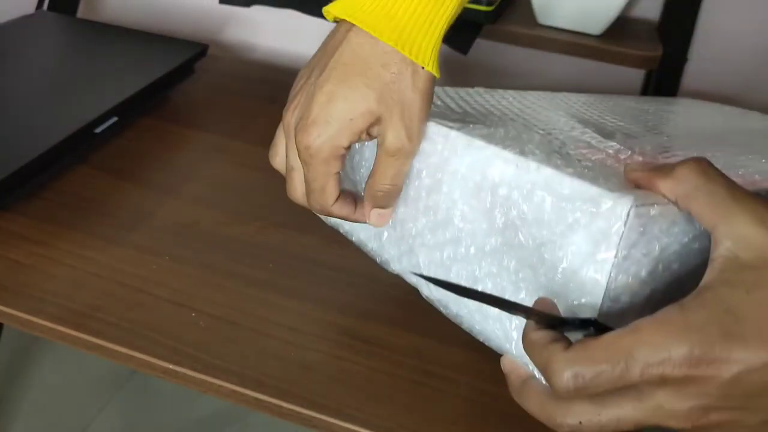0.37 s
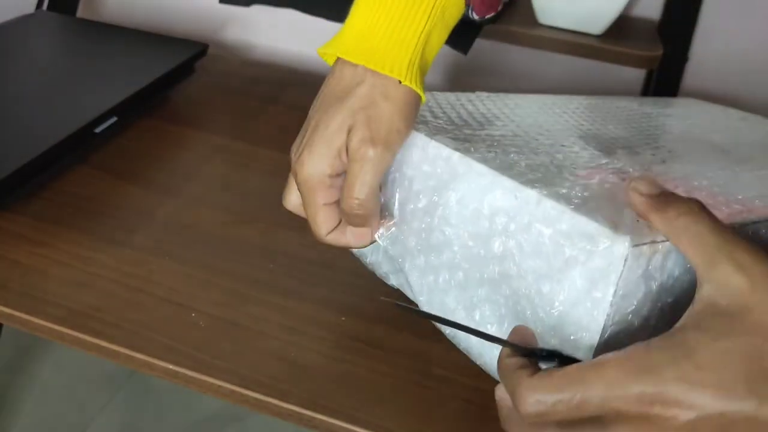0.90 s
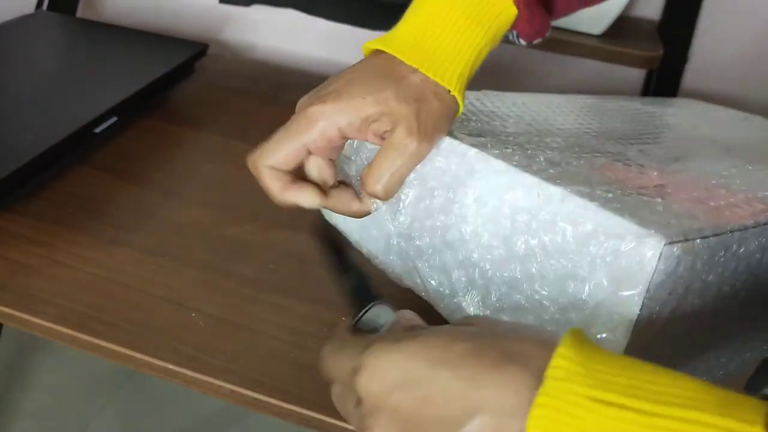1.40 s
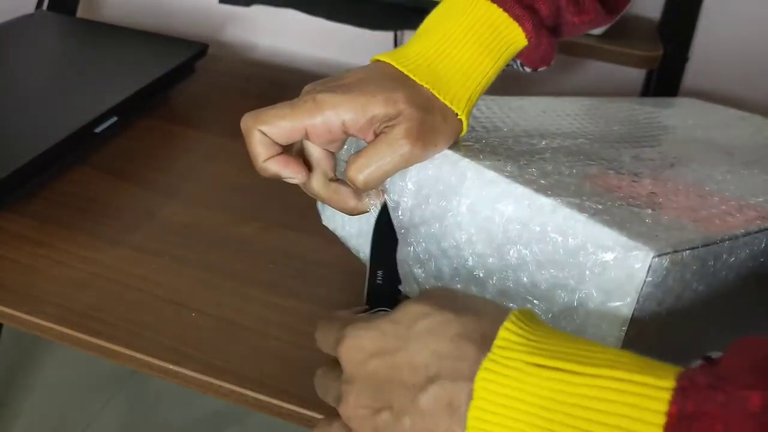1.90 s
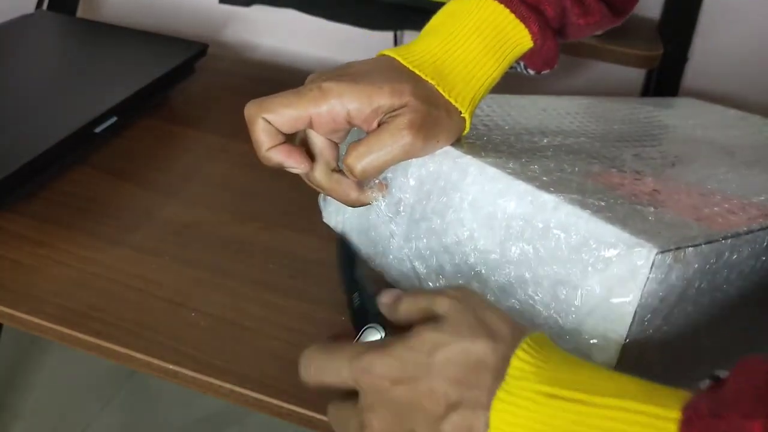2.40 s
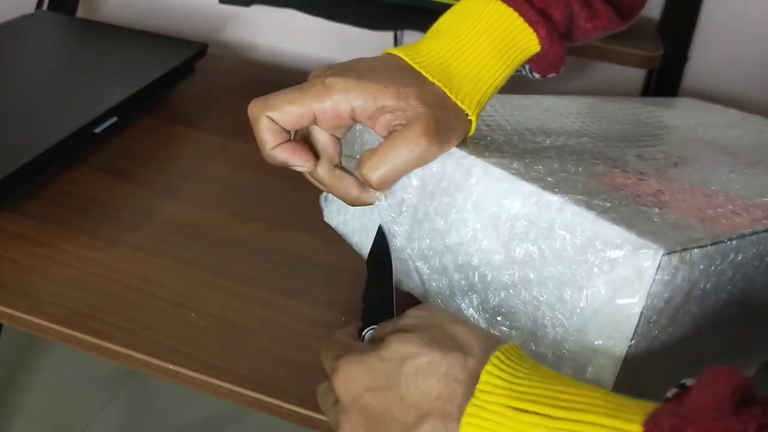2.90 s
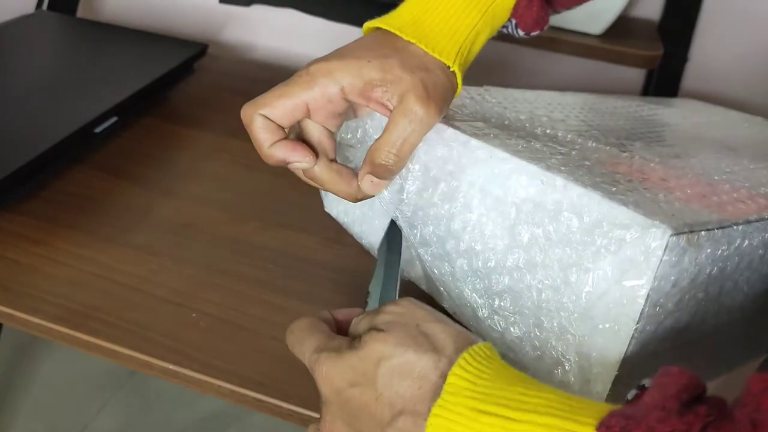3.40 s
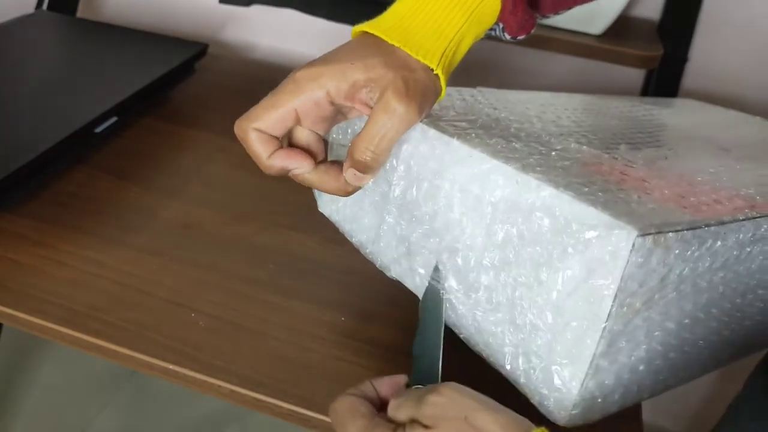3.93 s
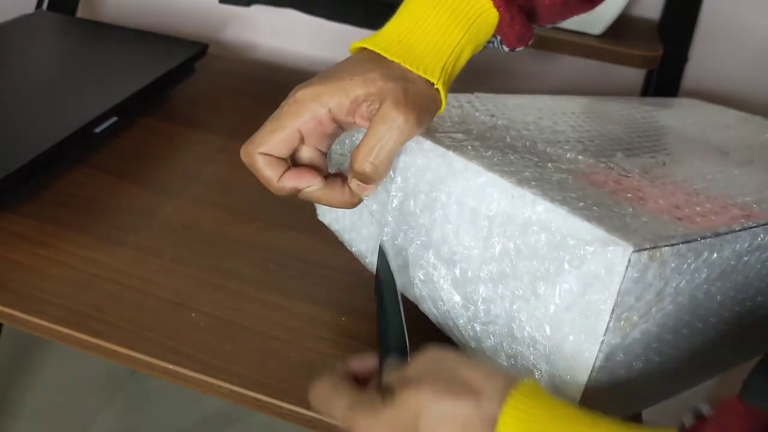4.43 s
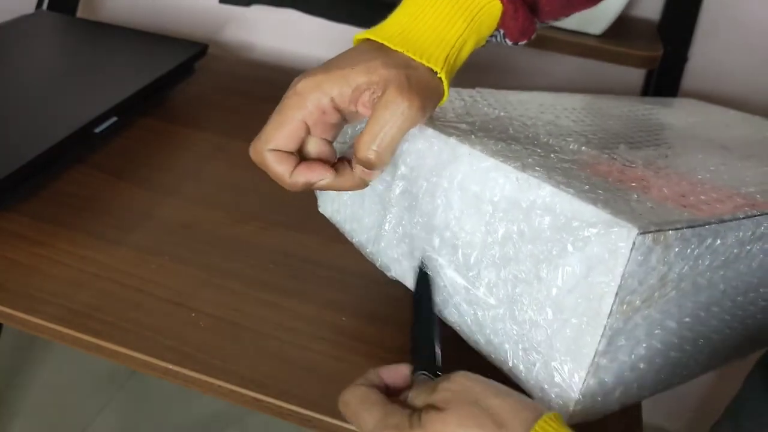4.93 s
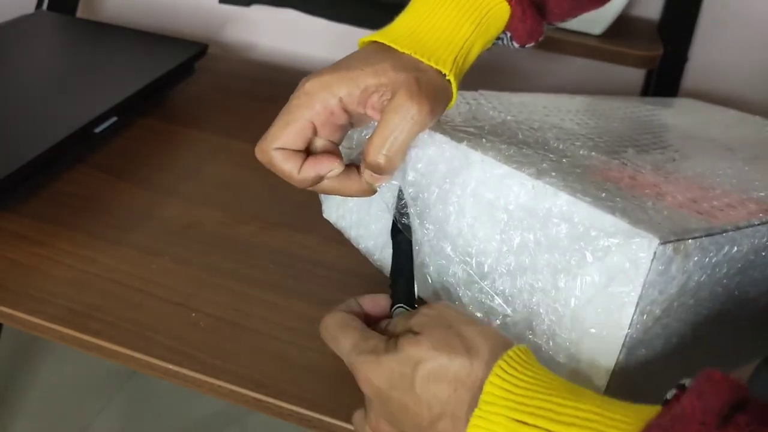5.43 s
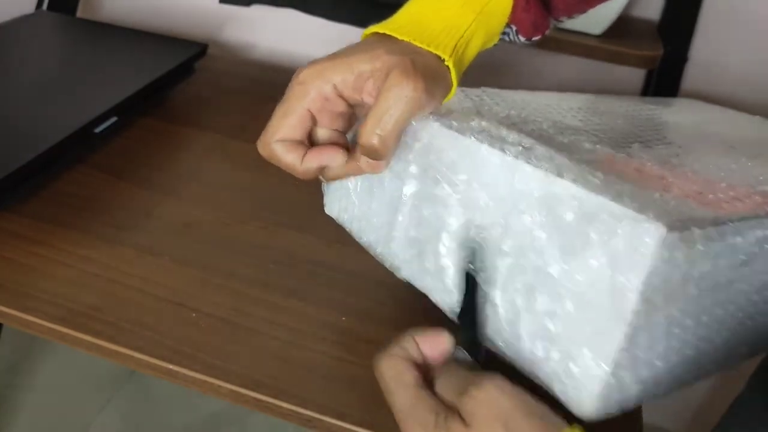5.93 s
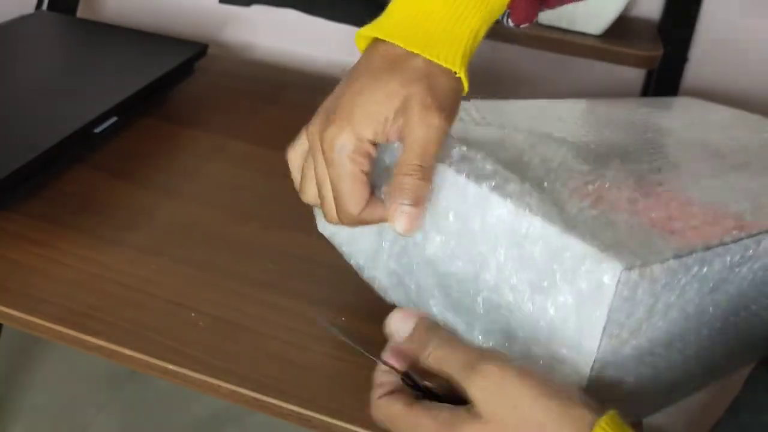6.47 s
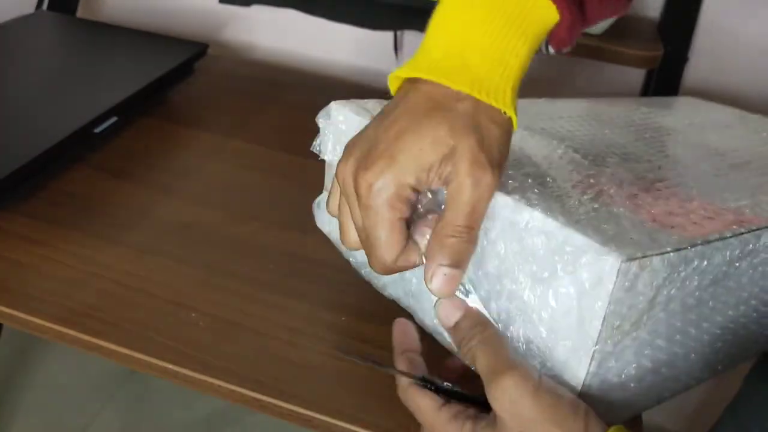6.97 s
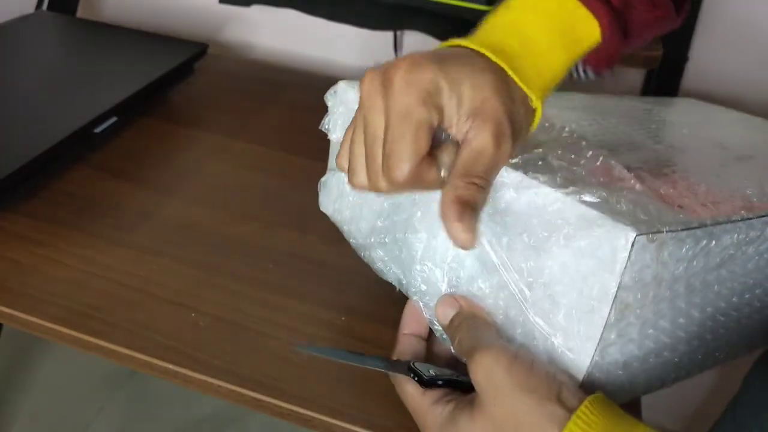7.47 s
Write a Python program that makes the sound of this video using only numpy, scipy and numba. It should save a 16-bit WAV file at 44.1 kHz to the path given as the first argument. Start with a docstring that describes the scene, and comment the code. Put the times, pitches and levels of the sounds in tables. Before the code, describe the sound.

Bubble wrap crinkles softly at a desk, with sparse small ticks, then hard popping snaps and a dense crackling burst at the end.

```python
"""Unwrapping a box from bubble wrap

Bubble wrap round a cardboard box is gripped, slit with a knife and pulled away on a desk, close to a phone.
Bubbles burst and creases snap, each a damped puff of air plus a bright noise crack; small creases crinkle between.
Jolts ring the box panels, taut film resonates, and a small hard room adds bounces and a decaying tail.
Underneath lie filtered-noise hum, hand rumble and soft bumps; a thin, wavering sine whine swells and fades."""
import sys
import numpy as np
from scipy import signal
from scipy.fft import rfft, irfft
from scipy.io import wavfile
from scipy.ndimage import uniform_filter1d
from numba import njit

SR = 44100
rng = np.random.default_rng(int(sys.argv[2]) if len(sys.argv) > 2 else 0)


def undo_db(level):
    """Turn decibels back into plain size, where 20 dB means ten times bigger."""
    steps = np.asarray(level, float) / 20
    return 10 ** steps


def store_wav(level_fs):
    """Save 16-bit WAV to argv[1]."""
    pcm = np.round(np.clip(np.atleast_2d(level_fs), -1, 1) * 32767)
    wavfile.write(sys.argv[1], SR, pcm.T.astype(np.int16))


N = 334719  # length [samples]


# bursting bubbles and snapping creases: (time [s], puff level [dB], crack level [dB], puff pitch [Hz])
BURSTS = [(0.4372, -39, -59, 700), (0.5364, -29.5, -33.5, 1660), (0.563, -35, -38, 1710),
          (0.6041, -24.5, -29.5, 1640), (0.9349, -38.5, -39, 1830), (0.9748, -32, -29, 1750),
          (0.9793, -22.5, -21, 1570), (1.0301, -34, -25.5, 1290), (1.05, -24, -20.5, 1320),
          (1.099, -22.5, -21, 1920), (1.4077, -37, -29.5, 2200), (1.5367, -41.5, -42, 1080),
          (1.8314, -43, -40.5, 900), (1.881, -46, -42, 700), (2.2022, -19.5, -16.5, 1290),
          (2.8228, -59, -50, 530), (2.841, -51.5, -69.5, 855), (3.0917, -43.5, -42, 1130),
          (3.1274, -42.5, -46, 1280), (3.1727, -46, -39, 1330), (3.225, -43.5, -59, 910),
          (3.3985, -35, -36, 1100), (3.5737, -35, -32, 1094), (3.578, -29, -35, 1110),
          (3.6038, -14, -12.5, 1320), (3.61, -22, -23, 1300), (3.624, -15, -19, 1340),
          (3.6395, -5.5, -11.5, 1300), (3.644, -10.5, -12, 1230), (3.6508, -11, -11, 1050),
          (3.9518, -25, -23, 1070), (4.0007, -21, -29, 1370), (4.3219, -40, -35, 1170),
          (4.3765, -37.5, -42.5, 1065), (4.4623, -31.5, -29, 1300), (4.6479, -48.5, -41, 1160),
          (4.8473, -36.5, -34, 1440), (5.0058, -36, -52, 1400), (5.0943, -37.5, -42, 1580),
          (5.2816, -29.5, -41.5, 967), (5.8205, -34.5, -37.5, 1210), (5.855, -6.5, -12, 1430),
          (6.0357, -38, -56, 1620), (6.0707, -28.5, -32.5, 1730), (6.1007, -24.5, -25.5, 1104),
          (6.1879, -31, -30, 2260), (6.596, -29, -36, 1170), (6.614, -21.5, -26, 1700),
          (6.6571, -35, -28, 1300), (6.908, -38, -34, 1840), (7.0025, -32, -41, 1150),
          (7.14, -27, -19.5, 1020), (7.174, -25, -32, 1840), (7.2366, -9, -11.5, 1030),
          (7.278, -36, -19.5, 1180), (7.2855, -21, -26.5, 1040), (7.2898, -19, -15.5, 1300),
          (7.307, -27, -21.5, 1340), (7.3228, -35, -18.5, 1283), (7.3424, -20.5, -13, 1240),
          (7.361, -31, -18, 1110), (7.3876, -16.5, -12, 1400), (7.4152, -21.5, -36.5, 1166),
          (7.4289, -29, -12, 1600), (7.489, -25, -14.5, 1850), (7.4986, -33, -24, 2160)]


def snaps():
    """Impulsive sources: each loud burst releases a puff of air and a crack of the film."""
    time_s, puff_db, crack_db, pitch_hz = np.transpose(BURSTS)
    onset_s = time_s - 0.25 / pitch_hz  # the puff sets in a quarter cycle before it is strong
    at = (onset_s * SR).astype(np.int64)
    return clicks(at, undo_db(puff_db), undo_db(crack_db), pitch_hz, film_noise(), cycles=0.28, crack_s=0.00036)


# how strongly the film crinkles; the first fast drop is the dying tail of a sound before the start:
# (time [s], level of dull creases [dB], bright creases over dull [dB])
CRINKLE_LEVEL = [(0, -47, 1.5), (.04, -58, 2), (.12, -64.5, 2), (.18, -75.5, -2), (.305, -73, 2),
                 (.315, -51, 0), (.5, -57.5, -1.5), (.7, -52, 1), (1.1, -59, -2.5), (1.3, -62, 1),
                 (1.41, -54.5, 2), (1.48, -66.5, 0.5), (1.8, -65, -5), (2.0, -64.5, 0.5), (2.45, -88.5, 5),
                 (2.63, -72, -8), (3.07, -73, -5), (3.1, -64.5, 2.5), (3.35, -66, 2.5), (3.55, -75.5, -0.5),
                 (3.8, -54, -6.5), (4.08, -54, -2), (4.2, -65, -4), (4.6, -66.5, -0.5), (5.1, -52, 0.5),
                 (5.44, -89, 2.5), (5.5, -48.5, -2), (5.56, -82, -4), (5.68, -65, 2.5), (6.08, -45.5, -6),
                 (6.2, -47, -2), (6.38, -68.5, -1), (6.47, -54, 0), (7.2, -54, 0), (7.3, -37.5, -8),
                 (7.45, -41.5, -3), (7.59, -50.5, 2)]
CREASES_PER_S = 1500


def crinkle():
    """Random point process: a dense crowd of creases, mostly faint, dull or bright by chance, in clumps."""
    count = int(CREASES_PER_S * N / SR)
    when, dull_chance, bright_chance, pitch_chance = rng.random((count, 4)).T
    at = (when * N).astype(np.int64)
    clump_db = 2.4 * np.repeat(rng.standard_normal(N // 600 + 1), 600)[at]
    crinkle_db, bright_db = (column[at] for column in curve(CRINKLE_LEVEL))
    # the log of a uniform chance spreads the levels exponentially in dB
    dull = undo_db(crinkle_db + clump_db - 4.0 - 2.41 * np.log(dull_chance))
    bright = undo_db(crinkle_db + bright_db + clump_db - 2.0 - 1.63 * np.log(bright_chance))
    pitch_hz = 1000 * 2 ** (1.6 * pitch_chance)
    return clicks(at, dull, bright, pitch_hz, film_noise(), cycles=0.26, crack_s=0.0002)


@njit
def clicks(at, puff, crack, hz, noise, cycles, crack_s):
    """Damped oscillation: suction, then a push of air, dies in about a cycle beside a ragged noise crack.

    Rows: puffs, cracks, puffs as bare ticks, cracks as bare ticks."""
    out = np.zeros((4, len(noise) + 400))
    edge = np.arange(150) / (SR * crack_s)
    shape = edge * np.exp(1 - edge)
    for k in range(len(at)):
        out[2, at[k]] += puff[k]
        out[3, at[k]] += crack[k]
        for i in range(400):
            turn = i * hz[k] / SR  # cycles elapsed
            swell = turn / cycles * np.exp(1 - turn / cycles)
            out[0, at[k] + i] -= puff[k] * swell * np.sin(2 * np.pi * turn)
        first = min(at[k], len(noise) - 150)
        ragged = shape * noise[first:first + 150]
        # raggedness changes the form of a crack, not its energy
        same_energy = np.sqrt(np.sum(shape ** 2) / np.sum(ragged ** 2))
        out[1, at[k]:at[k] + 150] += crack[k] * ragged * same_energy
    return out[:, :len(noise)]


def film_noise():
    """Band-limited noise: a treble texture that makes every crack ragged in its own way."""
    return band(rng.standard_normal(N), 3000.0, 15000.0)


# hands stretch the film taut: (start [s], end [s], pitch [Hz], level [dB])
STRETCHES = [(0.503, 1.15, 1610, -1.5), (7.217, 7.47, 1094, 0.5)]


def taut(puff):
    """Membrane resonance: while stretched, the film rings like a drum skin to every puff."""
    t = np.arange(N) / SR
    width = 1.283  # band edges as a ratio of the pitch
    ring = np.zeros(N)
    for start_s, end_s, hz, db in STRETCHES:
        during = (t > start_s) & (t < end_s)
        ring += undo_db(db) * band(puff * during, hz / width, hz * width)
    return ring


# jolts of the box: (time [s], level [dB])
JOLTS = [(.44, -51), (1.02, -40), (3.4, -38.5), (3.64, -31.5), (4.0, -34), (4.462, -47.5), (5.281, -38.5),
         (5.855, -22), (6.08, -35.5)]
# modes of the cardboard panels: (frequency [Hz], level [dB], time to decay by 60 dB [s])
PANEL_MODES = [(210, -7.5, 0.032), (394, -5, 0.029), (630, -6.1, 0.034)]


def box():
    """Modal ringing: jolts knock the cardboard against the desk and its panels ring briefly."""
    time_s, level_db = np.transpose(JOLTS)
    blows = np.bincount((time_s * SR).astype(int), undo_db(level_db), N)
    t = np.arange(SR // 5) / SR
    ring = sum(undo_db(db) * np.sin(2 * np.pi * hz * t) * np.exp(-np.log(1000) * t / t60)
               for hz, db, t60 in PANEL_MODES)
    return signal.fftconvolve(blows, ring)[:N]


# reverberation by band: (centre [Hz], time to decay by 60 dB [s], level [dB])
REVERBERATION = [(258, 0.53, -13), (700, 0.42, -7.5), (2140, 0.41, -12), (5400, 0.41, -13),
                 (11020, 0.33, -15)]


def room(puff, ragged, puff_tick, crack_tick, low_hz, knocks=0):
    """Direct, reflected and diffuse sound: the tail sums all directions, so it gets a smoother colour."""
    t = np.arange(SR // 2) / SR
    tail = sum(undo_db(db) * band(rng.standard_normal(len(t)), hz / 1.55, hz * 1.8) * np.exp(-np.log(1000) * t / t60)
               for hz, t60, db in REVERBERATION)
    tail = tail * (1 - np.exp(-t / 0.0034))  # the tail builds up within milliseconds
    body = band(puff, 410.0, 7000.0, order=1) + knocks
    direct = body + 1.054 * band(ragged, 4000.0, 12000.0)
    # two bounces off the desk
    bounces = 0.22 * np.roll(direct, int(0.0027 * SR)) - 0.28 * np.roll(direct, int(0.00075 * SR))
    puff_spread = 4.75 * band(puff_tick, low_hz, 3800.0, order=1)
    crack_spread = 4.4 * band(crack_tick, 3000.0, 22000.0)
    spread = 0.2 * body + puff_spread + crack_spread
    return direct + bounces + 0.12 * signal.fftconvolve(spread, tail)[:N]


# response of the phone microphone and its port: (frequency [Hz], gain [dB])
MIC_RESPONSE = [(60, -12), (200, 3.5), (700, -0.17), (1300, 0), (2300, 3), (3100, -3), (5300, -4.5),
                (6600, -6.5), (8500, 0.5), (10300, -6.5), (12000, -7), (15000, -11), (18000, -37.5)]


def microphone(film):
    """Transducer response: the microphone and its port colour the sound of film and box."""
    return colour(film, MIC_RESPONSE)


# soft bumps of hand and box on the desk: (time [s], level [dB])
DESK_BUMPS = [(0.047, -55.5), (0.322, -62), (0.559, -60.5), (1.015, -61.5), (4.799, -65), (5.299, -64.5),
              (6.599, -59), (6.849, -59.5), (7.469, -59)]


def bumps():
    """Amplitude-modulated noise: each bump is a short bell-shaped swell of low rumble."""
    t = np.arange(N) / SR
    pitch_hz, width_s = 100.7, 0.047
    swell = sum(undo_db(db) * np.exp(-((t - time_s) / width_s) ** 2) for time_s, db in DESK_BUMPS)
    low = band(rng.standard_normal(N), pitch_hz / 1.8, pitch_hz * 1.68)
    return swell * low / low.std()


# spectral shape of the room tone, scaled as a whole later: (frequency [Hz], relative density [dB])
TONE_SHAPE = [(18, -49.5), (30, -14), (70, -8), (112, -2.5), (194, -9), (600, -13.5), (1220, -31),
              (1540, -31), (16000, -50.5)]


def room_tone():
    """Power addition: low house hum joins the rumble of the handling hands, which follows the crinkle level."""
    hum_db, under_creases_db, top_db, walk_db = -73, -4.5, -60, 3
    noise = colour(rng.standard_normal(N), TONE_SHAPE)
    crinkle_db = curve(CRINKLE_LEVEL)[0]
    # the rumble saturates towards top_db
    rumble = 1 / (undo_db(-crinkle_db - under_creases_db) + undo_db(-top_db))
    steps = np.repeat(rng.standard_normal(N // 4000 + 1), 4000)
    walk = uniform_filter1d(steps, size=4000)[:N]
    # hum and rumble wander in level together
    return np.hypot(undo_db(hum_db), rumble) * undo_db(walk_db * walk) * noise / noise.std()


# thin whine: (time [s], frequency [Hz], level [dB rms]), before shake and throb
WHINE_PATH = [(1.46, 1117, -79.5), (1.56, 1172, -67), (1.65, 1217, -71), (1.73, 1180, -72.5),
              (1.9, 1240, -84.5)]


def whine():
    """Frequency and amplitude modulation: a thin, unsteady sine swells and fades."""
    hz, db = curve(WHINE_PATH)
    start_s, end_s = WHINE_PATH[0][0], WHINE_PATH[-1][0]
    fade = np.interp(np.arange(N) / SR, [start_s - 0.05, start_s, end_s, end_s + 0.05], [0, 1, 1, 0])
    shake, throb = (uniform_filter1d(rng.standard_normal(N), size=500) for _ in range(2))
    phase = 2 * np.pi * np.cumsum(hz + 300 * shake) / SR
    return np.sqrt(2) * fade * undo_db(db + 103 * throb) * np.sin(phase)


def curve(table):
    """Linear interpolation: the columns of a (time [s], value, ..) table, one value a sample."""
    time_s, *columns = np.transpose(table)
    return [np.interp(np.arange(N) / SR, time_s, column) for column in columns]


def colour(x, points):
    """Minimum phase: a causal filter through (Hz, dB) points, from the folded cepstrum of the log gain."""
    hz, db = np.transpose(points)
    grid = np.maximum(np.fft.rfftfreq(4096, 1 / SR), 1)
    cepstrum = irfft(np.log(undo_db(np.interp(np.log(grid), np.log(hz), db))))
    cepstrum[1:2048] *= 2
    cepstrum[2049:] = 0
    response = irfft(np.exp(rfft(cepstrum)))
    return signal.fftconvolve(x, response)[:len(x)]


def band(x, low_hz, high_hz, order=2):
    """Band-pass filtering with a maximally flat (Butterworth) response."""
    return signal.sosfilt(signal.butter(order, [low_hz, high_hz], "band", fs=SR, output="sos"), x)


def suppressor(x, memory_s, margin_db, depth_db):
    """Spectral subtraction: what falls well under its band's remembered level is turned down, so tails end early."""
    z = signal.stft(x, nperseg=512, noverlap=384)[2]
    power = uniform_filter1d(abs(z) ** 2, size=15, axis=1)
    power = uniform_filter1d(power, size=5, axis=2)
    level = np.log(power + 1e-14)
    keep = np.exp(-128 / SR / memory_s)  # one frame is 128 samples on
    start = level[..., :1]
    memory = signal.lfilter([1 - keep], [1, -keep], level - start, axis=2) + start
    gain = np.clip(1 - undo_db(margin_db) * np.exp((memory - level) / 2), undo_db(depth_db), 1)
    return signal.istft(z * gain, nperseg=512, noverlap=384)[1][:, :N]


def scene():
    """Superposition: film and box in the room, coloured by the microphone, over the background."""
    loud, small = snaps(), crinkle()
    puffs = loud[0] + small[0]
    puff_ticks = loud[2] + small[2]
    skin = taut(puffs + 4.6 * puff_ticks)
    # bursting bubbles reach lower than creases
    film = room(*loud, low_hz=240.0, knocks=box() + skin) + room(*small, low_hz=810.0)
    return (microphone(film) + room_tone() + whine() + bumps())[None]


def band_limit(x):
    """A steep low-pass at the top of the band."""
    return signal.sosfilt(signal.butter(12, 16510, fs=SR, output="sos"), x)


def record(dry):
    """Soft saturation: the phone suppresses noise, then rounds off the loudest bursts."""
    quieted = suppressor(dry, memory_s=0.23, margin_db=-16.5, depth_db=-3.5)
    mix = 1.314 * np.tanh(quieted / 1.1)
    return band_limit(mix)


dry = scene()
out = record(dry)
store_wav(out)
```